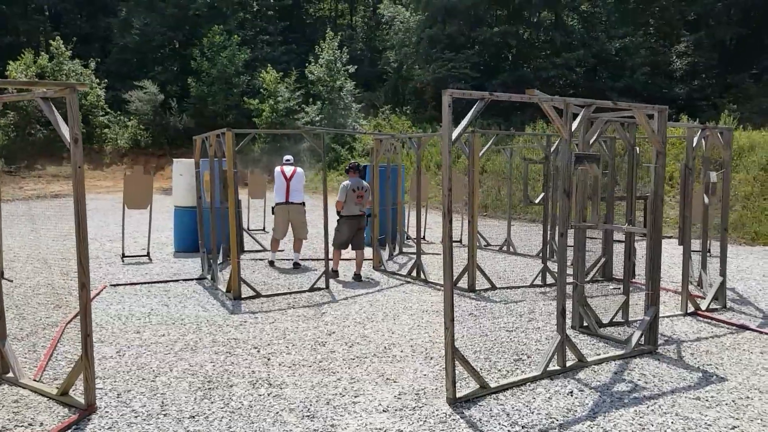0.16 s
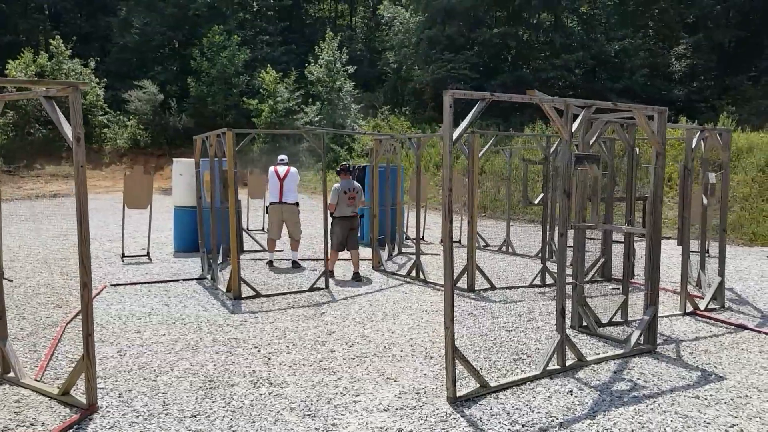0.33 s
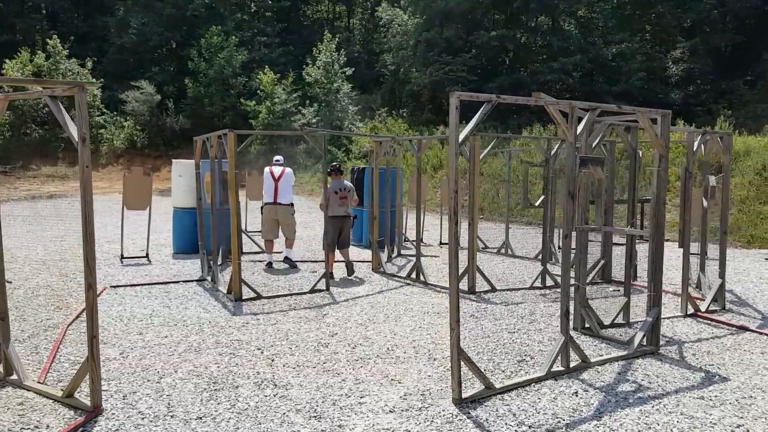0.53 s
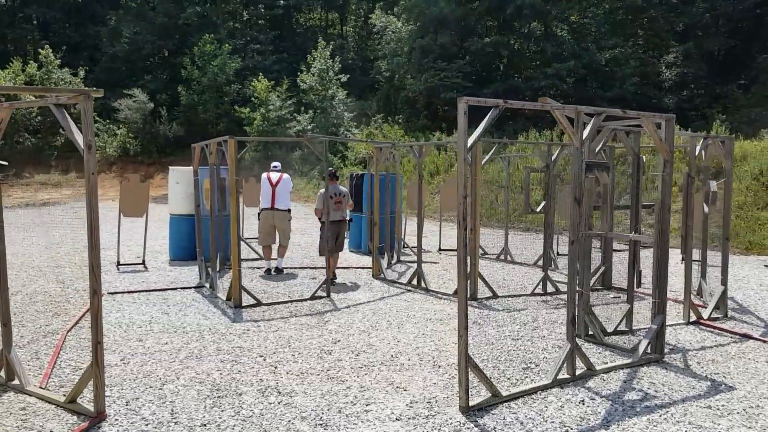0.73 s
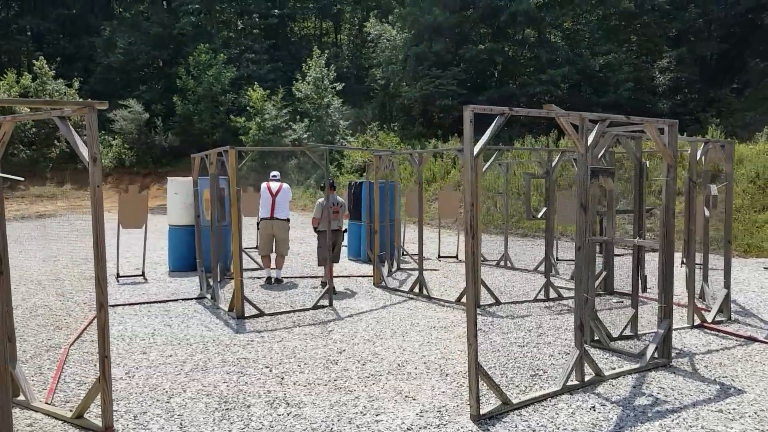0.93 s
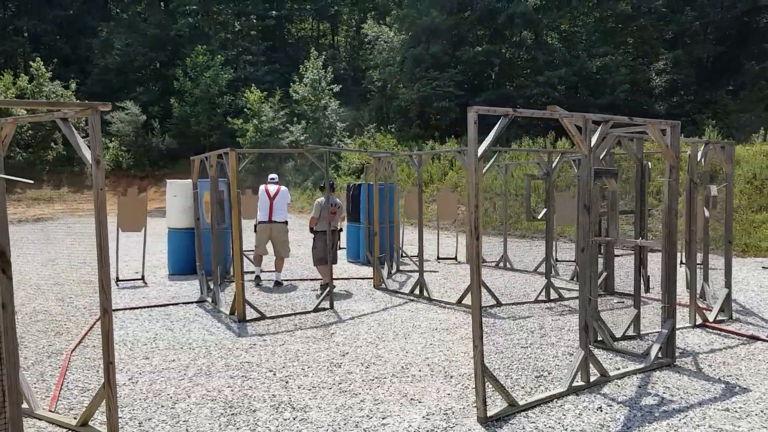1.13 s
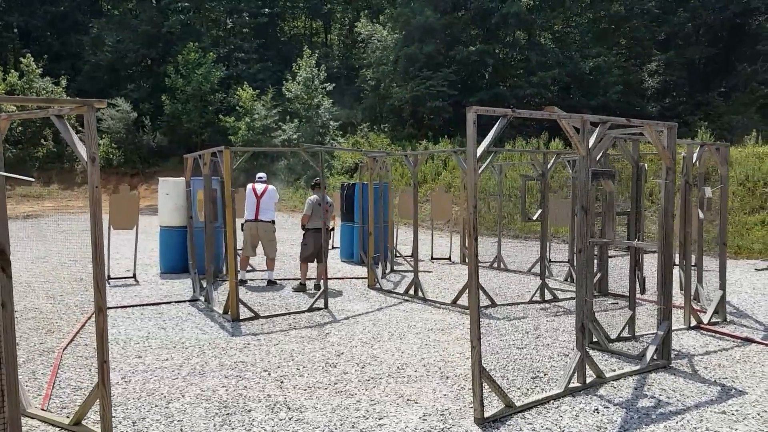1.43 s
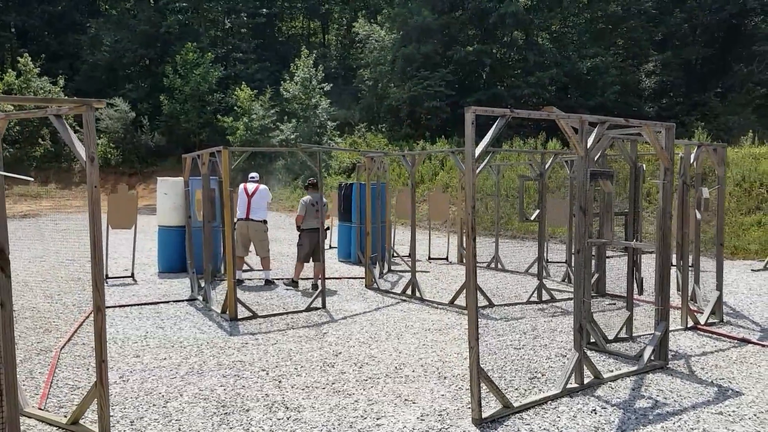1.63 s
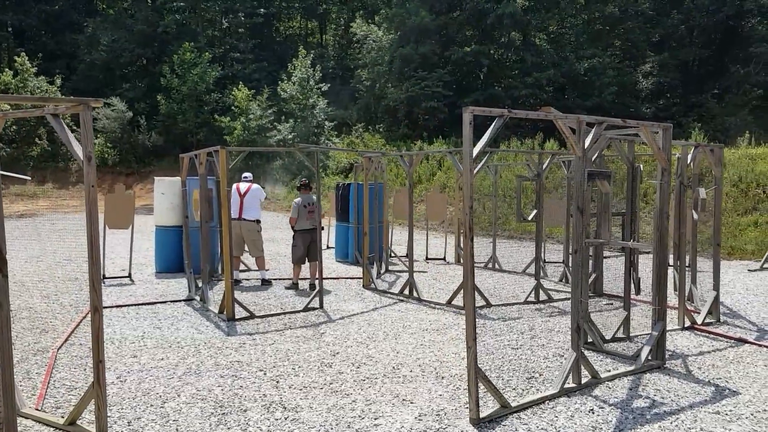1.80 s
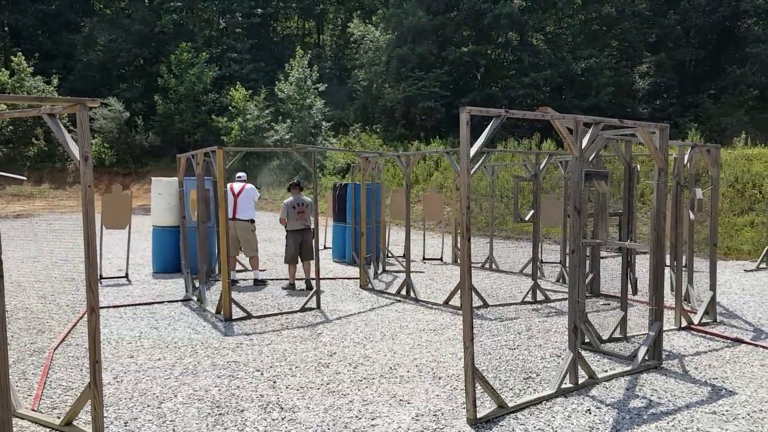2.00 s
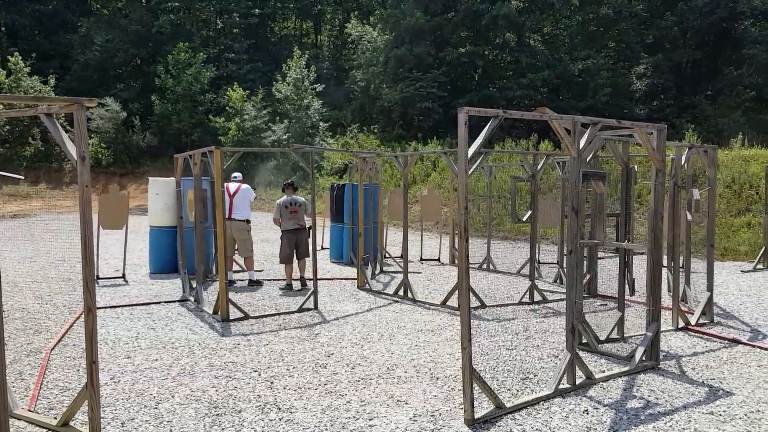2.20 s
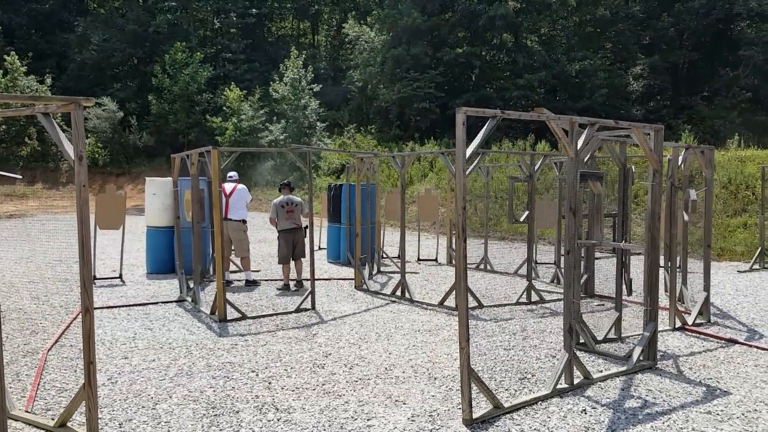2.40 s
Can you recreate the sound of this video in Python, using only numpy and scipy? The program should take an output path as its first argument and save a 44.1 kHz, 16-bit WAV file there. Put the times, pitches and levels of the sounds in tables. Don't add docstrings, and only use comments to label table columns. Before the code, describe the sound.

Five loud pistol shots outdoors, each with a short grainy echo off bank and trees

```python
import sys
import numpy as np
from scipy import signal
from scipy.fft import rfft, irfft
from scipy.io import wavfile
from scipy.ndimage import uniform_filter1d

SR = 44100
rng = np.random.default_rng(int(sys.argv[2]) if len(sys.argv) > 2 else 0)


def volts_from_decibels(level):
    exponent = np.asarray(level, float) / 20
    return 10 ** exponent


def generate_wav(signal):
    frames = np.transpose(np.atleast_2d(signal))
    scaled = np.clip(frames, -1, 1) * 32767
    pcm = np.round(scaled).astype(np.int16)
    wavfile.write(sys.argv[1], SR, pcm)


N = 112454

# frequency in Hz, likeness (1 is mono).
OPEN_LIKENESS = [(60, 0.28), (130, 1), (640, 0.78), (1400, 0.017), (3000, 0.022)]
ECHO_GRAIN_DB = 2


def read(table, hz):
    a = np.array(table, float)
    return np.interp(np.log(hz), np.log(a[:, 0]), a[:, 1])


def grains(n, spread_db):
    size_db = spread_db * np.minimum(rng.exponential(size=(2, n)), 4)
    x = rng.standard_normal((2, n)) * volts_from_decibels(size_db)
    return x / x.std()


def coloured(n, spectra, colour, like, shape):
    # frequency in Hz, gain in dB.
    mic_tone = [(20, -20), (45, -14), (100, 1), (5500, -0.5), (9500, 1.5), (13000, 1.5)]
    bands_hz = 30 * 2 ** np.arange(0, 9.6, .5)
    f = np.arange(n // 2 + 1) * SR / n + 1e-9
    octave = np.log2(f)
    tone = volts_from_decibels(read(colour, f) + read(mic_tone, f))
    out = 0
    for hz in bands_hz:
        mask = np.cos(np.pi * np.clip(octave - np.log2(hz), -.5, .5)) ** 2
        mid, side = irfft(spectra(hz) * mask * tone, n) * shape(hz)
        c = np.clip(read(like, hz), -1, 1)
        out = out + np.sqrt((1 + c) / 2) * mid
        out = out + np.sqrt((1 - c) / 2) * side * np.array([[1], [-1]])
    return out


def fade(t, t60):
    return volts_from_decibels(-60 * np.maximum(t, 0) / t60)


def walk(n, rate):
    k = max(int(SR / rate), 1)
    w = uniform_filter1d(uniform_filter1d(rng.standard_normal(n), k), k)
    return w / w.std()


def blast(t, colour, lead_s):
    # frequency in Hz, time to fall 60 dB in seconds.
    near_decay = [(60, 0.061), (150, 0.15), (300, 0.32), (450, 0.29), (800, 0.17), (2000, .24), (6000, 0.3),
                  (14000, 0.33)]
    # frequency in Hz, likeness.
    near_likeness = [(40, -.3), (120, .2), (250, .3), (640, .68), (1100, .4), (2000, .1), (4000, .02)]
    grain_db, lead_db, attack_s, hold_s = 1.5, -5.5, 0.00024, 0.0078
    crack_db, crack_s = 10, 0.0034
    post_count, snap_db, snap_span_s, snap_s = 6, 9, .009, .0005

    stream = rfft(grains(len(t), grain_db))
    u = t - lead_s
    posts = snap_span_s * rng.exponential(size=post_count)
    snaps = np.minimum(sum(np.exp(-((u - p) / snap_s) ** 2) for p in posts), 1)
    bright_db = crack_db * np.exp(-np.abs(u) / crack_s) + snap_db * snaps

    def shape(hz):
        lead = volts_from_decibels(lead_db) * np.minimum(t / lead_s, 1) * (hz < 1100)
        rise = np.maximum(np.clip(u / attack_s, 0, 1), lead)
        crack = volts_from_decibels(bright_db * np.clip(np.log2(hz / 1800) / 3.5, 0, 1))
        return rise * fade(u - hold_s, read(near_decay, hz)) * crack

    y = coloured(len(t), lambda hz: stream, colour, near_likeness, shape)
    return y / y[:, :int(.03 * SR)].std()


def thump(t, hz, db):
    turns, side_rad = 1.3, 1.5
    x = np.sin(2 * np.pi * hz * t + side_rad * np.array([[.5], [-.5]]))
    return volts_from_decibels(db) * x * np.exp(-t * hz / turns) * np.minimum(t * hz / 0.52, 1)


def trunks(t):
    # delay in seconds, level in dB.
    trunk_echoes = [(.1524, -31), (.1633, -26), (.1714, -25), (.186, -24), (.1946, -28), (.2085, -28),
                    (.2177, -21), (.2288, -19), (.2375, -26), (.2431, -26), (.2515, -25), (.2592, -28),
                    (.2855, -24), (.2958, -28), (.3069, -31), (.3284, -28), (.3437, -31), (.3644, -32),
                    (.4352, -33)]
    # delay in seconds, frequency in Hz, level in dB.
    bank_booms = [
        (0.031, 230, -22.5),
        (.058, 420, -14),
        (.083, 360, -23.5),
        (0.109, 195, -32.5),
        (.152, 205, -40),
        (.172, 194, -39.5),
        (.192, 184, -31.5),
        (0.238, 136, -48),
        (0.264, 196, -45),
        (.325, 110, -47),
    ]
    blip_hz, rise_s, fall_s, overtone_db = 640, .0009, .0017, -10
    scatter_db, detune, boom_turns = 1.2, .05, 0.82

    delay, db = np.array(trunk_echoes).T[:, :, None]
    luck = rng.standard_normal((len(delay), 3)).T[:, :, None]
    t = t[:int(.5 * SR)]
    u = t - delay
    turn = 2 * np.pi * blip_hz * (1 + detune * luck[0]) * u
    env = np.exp(-(u / np.where(u < 0, rise_s, fall_s)) ** 2 / 2)
    overtone = volts_from_decibels(overtone_db) * env * np.cos(2.36 * turn + luck[2])
    blip = env * (np.cos(turn) + overtone)
    out = (blip * volts_from_decibels(db + scatter_db * luck[1])).sum(0)
    for start, hz, boom_db in bank_booms:
        v = (t - start) * hz
        out = out + volts_from_decibels(boom_db) * np.exp(-(v / boom_turns) ** 2) * np.cos(2 * np.pi * v)
    return out


def grove_lift(t):
    # delay in seconds, length in seconds, lift in dB.
    groves = [
        (0.167, 0.0088, 4),
        (0.202, 0.002, -9.5),
        (0.233, 0.018, 5),
        (0.26, 0.013, 1),
        (0.272, 0.0071, 4.5),
        (0.334, 0.045, 3),
        (0.44, 0.011, 1),
    ]
    lift = 2.6 * np.tanh(walk(len(t), 160))
    for delay, length, db in groves:
        lift = lift + db * np.exp(-((t - delay) / length) ** 2)
    return lift


def woods(t, fixed, clumps):
    # frequency in Hz, level in dB per Hz.
    far_colour = [(24, -67), (40, -69), (85, -20.5), (382, -11.5), (585, -6), (896, -9), (1070, -7),
                  (8990, -27), (16000, -38)]
    # frequency in Hz, time to fall 60 dB in seconds.
    far_decay = [(60, 2), (180, 0.74), (400, 1.93), (700, 2.52), (2000, 1.62), (5000, 1.29), (10000, 0.87),
                 (15000, 0.73)]
    # frequency in Hz, share of the echo.
    repeated = [(200, 0.68), (650, 0.95), (2000, 0.6), (5000, 0.013)]
    # frequency in Hz, share of the lift and flutter.
    clumping = [(150, 0.72), (650, 1.1), (1500, 0.48), (4000, 1.14), (10000, 0.067)]
    bank_s, bank_rise_s, bank_hold_s, gap_db = 0.14, 0.01, 0.068, -5

    fresh = rfft(grains(len(t), ECHO_GRAIN_DB))
    before_bank = 1 - np.clip((t - bank_s) / bank_rise_s, 0, 1)
    rise = volts_from_decibels(gap_db * before_bank) * np.minimum(t / 0.0074, 1)

    def mixed(hz):
        share = np.clip(read(repeated, hz), 0, 1)
        return np.sqrt(share) * fixed + np.sqrt(1 - share) * fresh

    def shape(hz):
        fall = fade(t - bank_s - bank_hold_s, read(far_decay, hz))
        return rise * fall * volts_from_decibels(read(clumping, hz) * clumps)

    y = coloured(len(t), mixed, far_colour, OPEN_LIKENESS, shape)
    return y / y[:, int(.18 * SR):int(.3 * SR)].std()


def air():
    # frequency in Hz, level in dB per Hz.
    hush_colour = [(30, -2), (100, 4), (400, 1), (2000, 5), (6000, -32), (16000, -56)]
    n = N + N % 2
    stream = rfft(grains(n, 0))
    y = coloured(n, lambda hz: stream, hush_colour, OPEN_LIKENESS, lambda hz: 1)[:, :N]
    return volts_from_decibels(-54) * y / y.std()


def knock(t):
    at_s, length_s, hz = 0.145, 0.035, 43.4
    return volts_from_decibels(-49) * np.exp(-((t - at_s) / length_s) ** 2) * np.sin(2 * np.pi * hz * t)


def insect(t):
    start_hz, rise_hz_per_s, waver_hz = 9300, 4500, 60
    at_s, length_s = .12, 0.17
    hz = start_hz + rise_hz_per_s * t + waver_hz * walk(len(t), 300)
    trill = np.sin(2 * np.pi * np.cumsum(hz) / SR)
    return volts_from_decibels(-75) * np.exp(-((t - at_s) / length_s) ** 2) * trill


def add(out, x, at):
    i = int(round(at * SR))
    a = max(i, 0)
    b = max(min(i + x.shape[-1], N), a)
    out[:, a:b] += x[..., a - i:b - i]


def scene():
    # start in seconds, near scatter in dB, far echo in dB, thump in Hz, thump in dB.
    shots = [
        (-.58, -12, -24, 100, -25),
        (0.2067, -4, -29.5, 62, -29),
        (0.8315, -8.5, -29, 69.5, -26),
        (1.3718, -9, -29.5, 49, -29.5),
        (1.935, -8.5, -30, 136.1, -9),
        (2.2223, -9.5, -29.5, 118.5, -13),
    ]
    # frequency in Hz, level in dB per Hz.
    blast_colours = [
        [(24, -35), (40, -34.5), (427, -10), (686, -2), (859, -16.5), (1310, -5), (9650, -19), (15500, -33)],
        [(24, -60), (40, -9), (301, -15.5), (496, -12.5), (704, -1.5), (926, -11.5), (1310, -6), (15500, -37.5)],
        [(24, -31), (40, -14), (350, -13), (427, -13.5), (686, 0.5), (859, -10.5), (1310, -4), (15500, -35.5)],
        [(24, -50), (40, -22), (273, -15), (461, -3.5), (817, -1.5), (1100, 0.5), (1600, -3.5), (15500, -33)],
        [(24, -55), (40, -48), (797, -1.5), (926, -4.5), (1220, -1), (1730, -9.5), (2010, -10), (15500, -37)],
        [(24, -52), (40, -20), (300, -15.5), (620, -2.5), (1250, -2.5), (3200, -10.5), (5000, -18),
         (15500, -31)],
    ]
    echo_lags = [0, .0025, 0, .0013, .0005, 0]
    ring_s, lead_s = 1.3, 0.0029

    t = np.arange(2 * int(ring_s * SR / 2)) / SR
    whole = np.arange(N) / SR
    out = air() + knock(whole) + insect(whole)
    fixed = rfft(grains(len(t), ECHO_GRAIN_DB))
    clumps = grove_lift(t)
    for (at, near_db, far_db, hz, low_db), colour, lag in zip(shots, blast_colours, echo_lags):
        add(out, volts_from_decibels(near_db) * blast(t, colour, lead_s), at - lead_s)
        add(out, thump(t, hz, low_db), at)
        add(out, volts_from_decibels(far_db) * woods(t, fixed, clumps), at + lag)
        add(out, volts_from_decibels(far_db + 28.5) * trunks(t), at + lag)
    return out


def band_limit(x):
    return signal.sosfilt(signal.butter(12, 16530, fs=SR, output="sos"), x)


def record(dry):
    top_hz, bottom_hz, knee = 15750, 38, 8.0
    x = signal.sosfilt(signal.ellip(8, .3, 60, top_hz, fs=SR, output="sos"), dry)
    x = signal.sosfilt(signal.butter(2, bottom_hz, "high", fs=SR, output="sos"), x)
    flattened = x / (1 + np.abs(x) ** knee) ** (1 / knee)
    return band_limit(flattened)


dry = scene()
out = record(dry)
generate_wav(out)
```